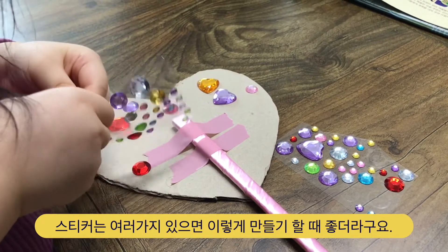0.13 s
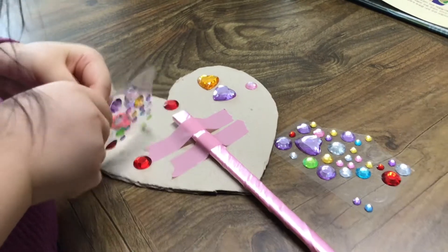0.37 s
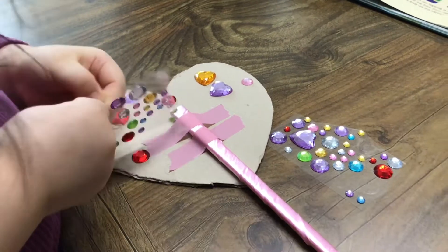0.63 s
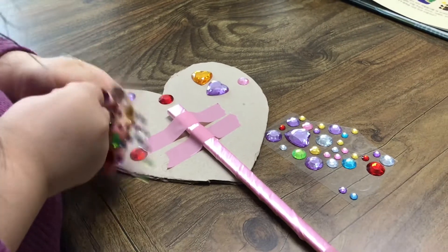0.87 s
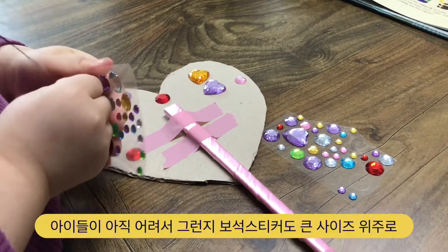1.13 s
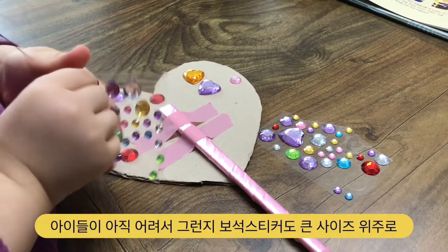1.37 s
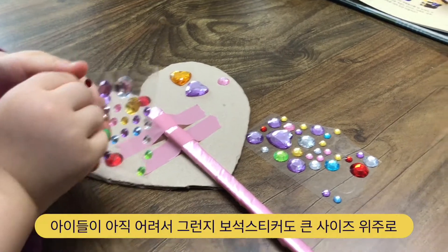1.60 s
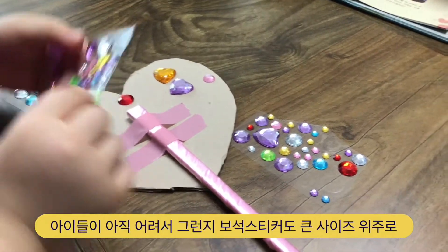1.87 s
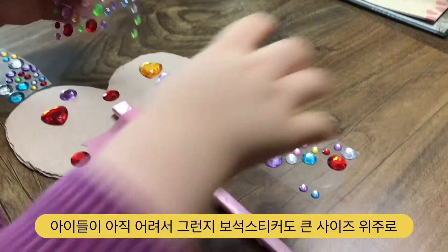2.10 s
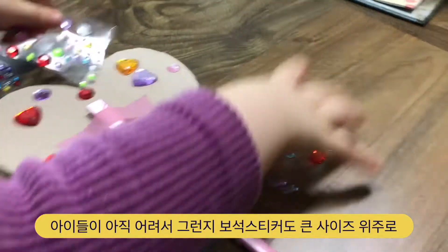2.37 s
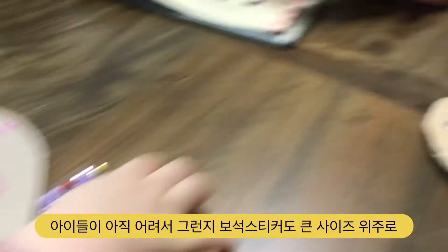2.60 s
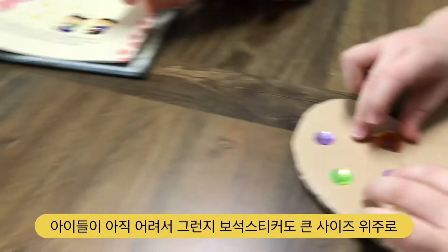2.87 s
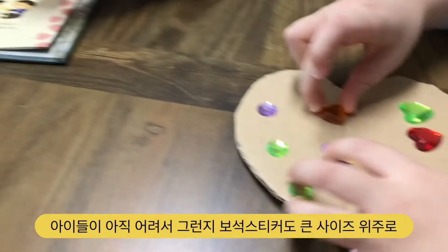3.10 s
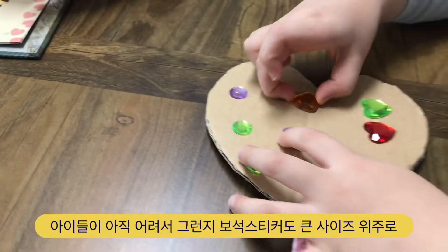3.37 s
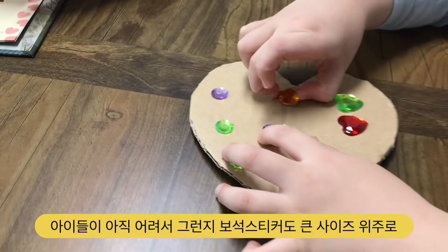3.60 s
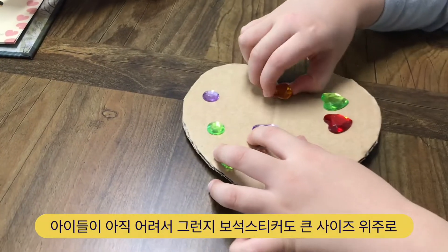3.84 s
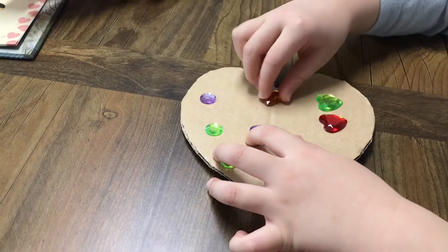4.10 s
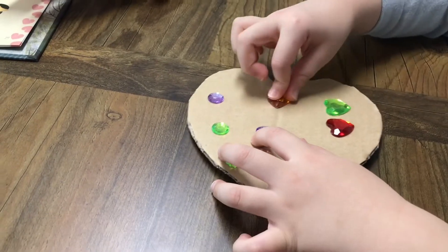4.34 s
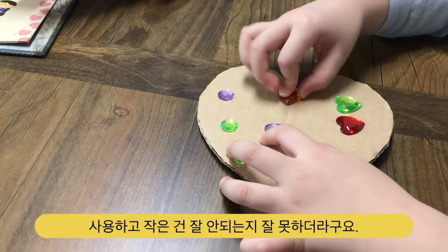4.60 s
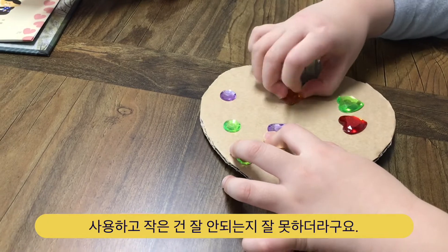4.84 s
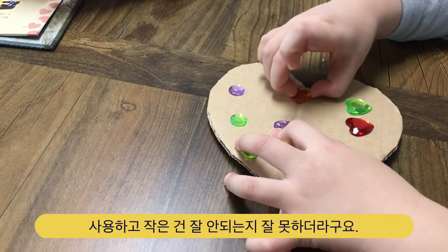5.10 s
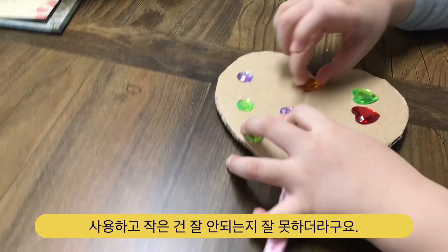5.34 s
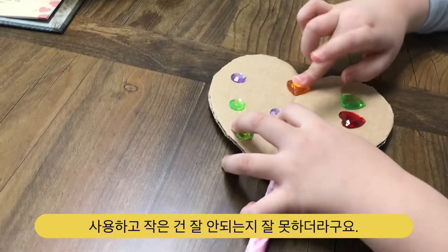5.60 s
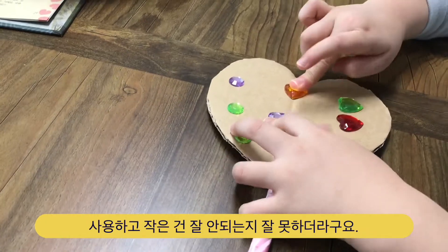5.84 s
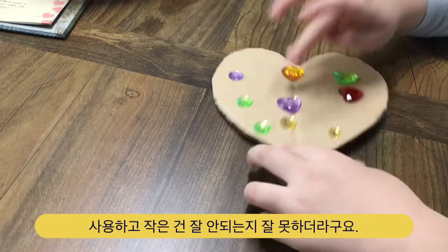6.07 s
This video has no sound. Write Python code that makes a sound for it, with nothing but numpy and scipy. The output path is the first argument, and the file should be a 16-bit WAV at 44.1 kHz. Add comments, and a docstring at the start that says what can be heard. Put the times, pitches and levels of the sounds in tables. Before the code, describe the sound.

A close phone microphone picks up small plastic gem stickers being handled on a wooden table in a quiet room, with faint low rumble and hum throughout. From 0 to 0.9 s, bright, short ringing snaps come thick and fast, with gritty click bursts, cardboard rubbing and a flexing, popping sheet, busiest around 0.45 s. Crinkles continue more sparsely; at 1.4 to 1.6 s hands knock the table in a quick woody clatter, capped by a sharp snap at 1.63 s. A hard double-toned snap lands at 2.4 s, another crisp one at 2.5 s. From 2.6 to 4.3 s it is softer: papery rubs, fine rustles, light taps, an isolated snap near 4.04 s. After 4.4 s, click bursts gather; crinkling swells to the loudest snap at 5.11 s, with gritty rips until 5.4 s. It calms, then a snap and table knock close at 6.2 s.

```python
"""Small plastic gems are peeled off a thin backing sheet and pressed onto cardboard on a wooden table.
A quiet room hums throughout while fingers rub the card and the sheet crinkles and pops.
Ringing glue snaps crowd the first second, with short bursts of tiny clicks; then they thin out and hands
knock the table. Sharp snaps stand out near 1.6 and 2.4 s; click bursts gather after 4.4 s, the strongest snap
comes near 5.1 s, and a last snap and knock close the scene. A phone close by hears it all."""
import sys
import numpy as np
from scipy import signal
from scipy.fft import rfft, irfft, next_fast_len
from scipy.io import wavfile
from scipy.ndimage import uniform_filter1d

SR = 44100
rng = np.random.default_rng(int(sys.argv[2]) if len(sys.argv) > 2 else 0)


def field_ratio(decibels):
    """Amplitude ratio for a level in dB (20 dB per decade); scalars and array-likes work."""
    return 10 ** (np.asarray(decibels, dtype=float) / 20)


def generate_wav(sig):
    """Save sig (samples, or channels by samples) to the path in sys.argv[1] as 16-bit PCM at SR."""
    pcm = np.round(np.clip(np.atleast_2d(sig).T, -1, 1) * 32767).astype(np.int16)
    wavfile.write(sys.argv[1], SR, pcm)


N = 273861

# resonances of the cardboard: pitch_hz, width_hz (first of two passes), level_db (relative)
CARD_MODES = [(1800, 170, -3), (2477, 460, 1), (3070, 600, -1), (3800, 750, 1), (5540, 2150, -12.5)]


def level(x, db):
    """Scale to an rms level."""
    return x * field_ratio(db) / np.sqrt(np.mean(x ** 2))


def peak(x, db):
    """Scale to a peak level."""
    return x * field_ratio(db) / np.max(np.abs(x))


def ring(x, hz, width_hz):
    """One resonance, a peak filter whose centre and width stay below 0.45 of the sample rate."""
    centre = min(hz, .45 * SR)
    width = min(width_hz, .45 * SR)
    b, a = signal.iirpeak(centre, centre / width, fs=SR)
    return signal.lfilter(b, a, x)


def treble(x, hz):
    """What lies above hz."""
    return signal.sosfilt(signal.butter(2, hz, "high", fs=SR, output="sos"), x)


def colour(x, spectrum):
    """Filter a sound by a curve of (Hz, dB) points, joined over log frequency."""
    hz, db = np.transpose(spectrum)
    size = next_fast_len(N)
    f = np.arange(size // 2 + 1) * SR / size + 1
    gain = field_ratio(np.interp(np.log(f), np.log(hz), db, left=-60, right=-60))
    return irfft(rfft(x, size) * gain, size)[:N]


def walk(rate):
    """Random levels that glide to a new value every 1 / rate s; spread near 1."""
    k = int(SR / rate)
    held = np.repeat(rng.standard_normal(N // k + 1), k)
    return 1.5 * uniform_filter1d(held, k)[:N]


def grit(shape, scatter_db, grain_s):
    """Noise in grains whose sizes scatter, a few of them large."""
    k = max(int(grain_s * SR), 1)
    grains = shape[-1] // k + 1
    sizes = field_ratio(scatter_db * rng.exponential(size=shape[:-1] + (grains,)))
    return rng.standard_normal(shape) * np.repeat(sizes, k, axis=-1)[..., :shape[-1]]


def add(out, s, x):
    """Mix x into out from time s."""
    i = int(s * SR)
    out[i:i + len(x)] += x[:len(out) - i]


def room():
    """Air and appliance rumble that wavers a little, with a wavering hum."""
    # room noise: pitch_hz, density_db (relative, per Hz)
    room_spectrum = [(28, -45), (40, -2), (64, 0), (109, -0.5), (250, -8), (355, -8.5), (461, -16.5),
                     (780, -19.5), (2100, -28), (3900, -27.5), (8500, -29), (16500, -32)]
    room_db, hum_hz, hum_db = -61, 118.5, -72  # rms before the wavering
    air = level(colour(rng.standard_normal(N), room_spectrum), room_db) * field_ratio(walk(4.886))
    hum = np.sqrt(2) * field_ratio(hum_db + walk(2.0)) * np.sin(2 * np.pi * hum_hz * np.arange(N) / SR)
    return air + hum


def card(x, sway_db):
    """The cardboard's resonances, neighbours in opposite phase; sway_db lets each swell on its own."""
    out = 0
    for k, ((hz, width, db), sway) in enumerate(zip(CARD_MODES, sway_db)):
        mode = ring(ring(x, hz, width), hz, 2 * width)
        out = out + (-1) ** k * field_ratio(db + sway) * mode
    return out


def swells(s, db, swell, fade):
    """Gain of overlapping gestures; each is 20 dB down swell s before and fade s after its loudest moment."""
    resting_db = -83  # floor under all the gestures
    t = np.arange(0, N, 64) / SR
    power = field_ratio(2 * resting_db)
    for k in range(len(s)):
        distance = np.maximum((s[k] - t) / swell[k], (t - s[k]) / fade[k])
        power = power + field_ratio(2 * db[k] - 40 * distance)
    return np.interp(np.arange(N) / SR, t, np.sqrt(power))


def ticks(gain):
    """Single small creases snap at random moments, as loud as the sheet is busy."""
    ticks_per_s = 130
    out, t = np.zeros(N), np.arange(512) / SR
    count = int(ticks_per_s * N / SR)
    draws = zip(rng.random((count, 3)), rng.standard_normal((count, len(t))))
    for (when, pitch, size), noise in draws:
        hz = 1500 * 8.0 ** pitch
        burst = noise * field_ratio(-60 * t / .009)
        tick = peak(ring(burst, hz, .5 * hz), 3 + 8 * size)  # peaks 3 to 11 dB over the gain
        add(out, when * N / SR, tick * gain[int(when * N)])
    return out


def pops(low_hz, high_hz, tilt_db, scatter_db, count=14):
    """Creases in the sheet flip over, each ringing a few cycles at its own pitch."""
    out = 0
    for hz in np.geomspace(low_hz, high_hz, count):
        crease = ring(ring(grit((N,), scatter_db, 0.0022), hz, hz / 7), hz, hz / 3)
        out = out + field_ratio(tilt_db * np.log2(hz / low_hz)) * crease  # tilt in dB per octave
    return level(out, 0)


def hands():
    """Skin slips over the card's fibres, the sheet crinkles in fine grains and pops where it flexes."""
    # hand moves, rustles that swell and fade (levels before the random flicker):
    # loudest_s, card_rub_db, sheet_crinkle_db, swell_s, fade_s
    moves = [(0.0, -58.5, -64, .05, 0.12), (0.118, -54.5, -54, 0.027, 0.075),
             (0.233, -53, -55, 0.055, 0.087), (0.303, -61, -52, 0.096, .05),
             (0.351, -67, -59.5, 0.059, 0.2), (0.479, -50, -51, 0.075, 0.053), (0.56, -83, -60, 0.11, 0.12),
             (0.698, -57, -53.5, 0.081, 0.087), (0.804, -77, -61, 0.68, 0.52),
             (1.023, -68, -55, 0.062, 0.07), (1.124, -59, -50, 0.038, 0.031),
             (1.269, -66, -47.5, 0.09, 0.059), (1.399, -75, -67, 0.067, 0.18),
             (1.644, -61, -54.5, 0.15, 0.31), (1.772, -61, -53.5, 0.033, 0.047),
             (1.922, -72, -51, 0.23, 0.12), (2.176, -63, -62.5, 0.035, 0.14),
             (2.33, -59.5, -55, 0.049, 0.2), (2.42, -56.5, -59.5, 0.13, 0.091),
             (2.51, -50, -49, 0.073, 0.067), (2.654, -55.5, -57, 0.094, 0.097),
             (2.756, -57, -65.5, 0.19, 0.55), (2.852, -55, -49.5, 0.087, 0.12),
             (3.026, -54.5, -57, 0.16, 0.2), (3.24, -58, -52.5, 0.18, 0.088),
             (3.265, -48.5, -71, 0.033, 0.14), (3.52, -63.5, -60, 0.17, 0.045),
             (3.655, -57, -65, 0.065, 0.24), (3.801, -63, -57, 0.1, 0.082), (3.945, -59, -90, 0.25, 0.26),
             (4.06, -59, -59, 0.087, 0.093), (4.188, -64.5, -69.5, 0.49, 0.078),
             (4.272, -62.5, -68.5, 0.044, 0.21), (4.438, -56.5, -53, 0.076, 0.076),
             (4.5, -60, -62, 0.14, 0.033), (4.685, -60, -80, 0.41, 0.17), (4.957, -57.5, -51, 0.16, 0.33),
             (5.07, -76, -47, 0.23, 0.28), (5.16, -52, -46.5, 0.18, 0.091), (5.235, -55, -55, 0.08, 0.22),
             (5.335, -47, -55, 0.045, 0.11), (5.38, -50.5, -56.5, 0.27, 0.061),
             (5.625, -90.5, -63.5, 0.059, 0.089), (5.745, -58.5, -69.5, 0.11, 0.87),
             (5.936, -55, -49, 0.082, 0.11)]
    # the sheet bends and its creases pop: loudest_s, level_db, swell_s, fade_s
    bends = [(0.233, -55, 0.08, 0.3), (0.459, -47, 0.033, 0.11), (0.698, -54, 0.071, 0.092),
             (1.399, -66, 0.43, 0.21), (1.644, -59, 0.29, 0.26), (1.772, -65.5, 0.073, 0.48),
             (2.42, -60, 0.22, 0.12), (2.51, -56.5, 0.14, 0.17), (2.67, -61.5, 0.088, 0.13),
             (2.9, -72, 0.47, 0.95), (3.24, -66.5, 0.075, 0.38), (3.827, -67, 0.19, 0.4),
             (5.124, -57, 0.06, 0.34), (5.27, -55.5, 0.34, 0.088), (5.895, -65.5, 0.38, 0.11)]
    # crinkle of the sheet: pitch_hz, density_db (relative, per Hz)
    sheet_spectrum = [(1200, -41), (2500, -13), (4500, -6), (6000, -4.5), (9000, -2), (16500, -6.5)]

    s, card_db, sheet_db, swell, fade = np.transpose(moves)
    crinkle_gain = swells(s, sheet_db, swell, fade)
    fibres = grit((N,), 2.1, .0012)
    sway_db = 2.2 * np.array([walk(25) for _ in CARD_MODES])
    rub = level(card(fibres, sway_db), 0)
    rub = rub * swells(s, card_db, swell, fade) * field_ratio(1.2 * walk(40))

    sheet = level(colour(grit((N,), 1.4, 0.00051), sheet_spectrum), 0)
    bright = treble(sheet, 8700)  # the finest creases flicker on their own
    sheet = (sheet - bright) * field_ratio(2 * walk(30)) + bright * field_ratio(2 * walk(18))
    crinkle = sheet * crinkle_gain * field_ratio(walk(45))

    flex = pops(520, 2600, tilt_db=-1.5, scatter_db=2.4) * swells(*np.transpose(bends))
    return rub + crinkle + ticks(crinkle_gain) + flex


def table_top(force):
    """The table's modes under a force; the slowest motion radiates poorly."""
    # modes of the wooden top: pitch_hz, level_db (relative), t60_s
    table_modes = [(104, -2.5, 0.034), (213, -3.5, 0.038), (371.5, 3, 0.045), (580, 2, 0.035),
                   (692, 5.5, 0.09), (903, 7.5, 0.052), (1090, 11.5, 0.047), (1530, 17, 0.027)]
    t = np.arange(4096) / SR
    board = sum(field_ratio(db - 60 * t / t60) * np.sin(2 * np.pi * hz * t) for hz, db, t60 in table_modes)
    return treble(signal.fftconvolve(force, board), 132)


def knocks():
    """A half-sine push on the table; a softer, longer contact favours the low modes."""
    # hands knocking the table: start_s, peak_db, contact_s
    knock_table = [(0.255, -42.5, 0.0085), (1.3843, -27.5, 0.0032), (1.399, -44, 0.0018),
                   (1.478, -35.5, 0.0037), (1.535, -35, 0.0032), (1.575, -39, 0.0024),
                   (1.594, -38.5, 0.002), (1.6322, -27.5, 0.00078), (2.311, -43, 0.0039),
                   (2.685, -48.5, 0.0015), (2.835, -47.5, 0.0018), (2.959, -40, 0.0011),
                   (3.166, -55, 0.001), (3.608, -53.5, 0.001), (3.812, -46.5, 0.00084),
                   (3.848, -49.5, 0.00078), (3.908, -54, 0.0012), (4.406, -40.5, 0.0024),
                   (4.427, -45, 0.0032), (6.195, -37.5, 0.0011)]
    out, t = np.zeros(N), np.arange(1024) / SR
    for s, db, contact in knock_table:
        push = np.sin(np.pi * np.clip(t / contact, 0, 1))
        add(out, s, peak(table_top(push), db))
    return out


def click_bursts():
    """Short bursts of dense tiny clicks, grainy noise that starts sharply and soon dies out."""
    # glue rips, the clatter of taps near 1.4 to 1.5 s and the tail of the snap at 2.4 s:
    # start_s, level_db (rms of the body, its energy spread over length_s), ring_hz,
    # treble_db (relative to the body), length_s
    burst_table = [(0.267, -45.5, 2240, -6, 0.02), (0.447, -34.5, 2740, -15, 0.01),
                   (0.458, -40, 6030, 1, 0.0042), (0.464, -38.5, 6600, -1.5, 0.011),
                   (1.11, -51.5, 2300, 6.5, 0.0086), (1.38, -49, 3930, 7, 0.0083),
                   (1.475, -46.5, 4070, -2, 0.0068), (1.53, -48, 3420, -16, 0.0097),
                   (1.574, -46.5, 2170, -7.5, 0.029), (2.414, -55, 1700, -25, 0.063),
                   (4.386, -55.5, 6000, 8, 0.027), (4.616, -55, 2940, -19, 0.063),
                   (4.67, -47.5, 2780, -19, 0.018), (4.785, -51, 3020, -12, 0.047),
                   (5.194, -43.5, 2930, -4, 0.015), (5.209, -39.5, 2680, 6, 0.013),
                   (5.2407, -37, 2200, -26, 0.024)]
    out, t = np.zeros(N), np.arange(4096) / SR
    clicks = grit((len(burst_table), 2, len(t)), 2.8, .001)
    for (s, db, hz, treble_db, length), noise in zip(burst_table, clicks):
        shape = np.minimum(t / .001, 1) * np.exp(-(t / length) ** 4)
        gain = np.sqrt(SR * length / len(t))  # from rms over the whole buffer to rms over the burst
        body = level(ring(ring(noise[0] * shape, hz, hz / 1.52), hz, 9.9 * hz), db)
        hiss = level(treble(noise[1] * shape, 5400), db + treble_db)
        add(out, s, gain * (body + hiss))
    return out


def sheet_ring(force, scatter):
    """The sheet's modes under a force; every grip shifts and weights them a little differently."""
    # modes of the sheet before the scatter: pitch_hz, level_db (relative), t60_s
    sheet_modes = [(1280, -0.5, 0.019), (1650, 0, 0.028), (2440, -8, 0.026), (2880, -7, 0.018),
                   (3666, 5.5, 0.016), (4520, 7, 0.0045), (6100, -2.5, 0.018), (6970, 7.5, 0.011)]
    t = np.arange(1024) / SR
    modes = 0
    for (hz, db, t60), (a, b) in zip(sheet_modes, scatter):
        decay = field_ratio(db + 2.5 * a - 60 * t / t60)
        modes = modes + decay * np.sin(2 * np.pi * hz * (1 + .02 * b) * t)
    return signal.fftconvolve(force, modes)[:len(force)]


def snaps():
    """A sudden release rings the gem and the sheet, thuds low, cracks in the treble and leaves a faint tail."""
    # glue and plastic snaps: start_s, level_db (reference for the peak of each part below), ring_hz,
    # crack_db and thud_db (relative to level_db, before the trims below)
    snap_table = [(0.0145, -18, 3400, -50, -21.5), (0.0813, -22, 4300, -19, -32),
                  (0.0988, -30, 4500, -11.5, -21), (0.122, -20.5, 2230, -33, -35),
                  (0.1933, -39, 1800, -8, -17), (0.2005, -18.5, 2040, -25, -30),
                  (0.225, -27, 1800, -7, -21.5), (0.306, -37, 3500, -3, -10),
                  (0.3129, -24.5, 5970, -19, -24), (0.346, -40.5, 2200, -6.5, -15),
                  (0.38, -40, 2460, -27, -14), (0.43, -39, 2300, 5, -35), (0.4473, -23, 2350, -6.5, -17.5),
                  (0.521, -32, 1570, -15, -33), (0.5397, -40.5, 850, -15, -19),
                  (0.6463, -33.5, 1780, -12, -26), (0.662, -28, 3800, -14.5, -28),
                  (0.677, -31.5, 2400, -30, -12.5), (0.694, -46, 960, -27, -1),
                  (0.7972, -34.5, 5660, -7, -21), (0.862, -37, 9100, -2.5, -38),
                  (1.1108, -35, 7550, -17, -36), (1.218, -31.5, 8300, -12, -34),
                  (1.3841, -30.5, 1650, -16, -23), (1.402, -38, 2200, -6, -10.5),
                  (1.4762, -30.5, 1650, -14, -37), (1.531, -32.5, 1650, -20, -27),
                  (1.54, -39, 1310, -20, -12), (1.6282, -13, 6500, -14, -23.5),
                  (1.912, -32, 3300, -4.5, -39), (1.926, -34.5, 5000, -8, -32),
                  (2.207, -33.5, 6270, -13.5, -20), (2.3118, -41.5, 1560, -7.5, -15),
                  (2.4096, -14, 1730, -31, -42), (2.4096, -15, 4670, -31, -47), (2.42, -46, 2000, -15, -32),
                  (2.49, -36, 2270, -5, -36), (2.5014, -21.5, 5060, -3.5, -21.5),
                  (2.784, -34, 2900, -13, -33), (2.9608, -32, 5950, -4.5, -19),
                  (3.2303, -36, 2400, -22, -35), (3.423, -28.5, 2400, -47, -41),
                  (3.658, -38, 2500, -28, -35), (4.041, -25, 4200, -10.5, -53),
                  (4.5608, -27.5, 2900, -12.5, -24.5), (5.0508, -29.5, 2820, -35, -12),
                  (5.1136, -8, 2530, -23, -58), (5.696, -31.5, 4840, -21, -42),
                  (6.1778, -32, 2330, -14, -34), (6.1936, -23, 2160, -9.5, -21)]
    snap_t60_s, tail_t60_s = .012, .045
    out, t = np.zeros(N), np.arange(4096) / SR
    rise = np.minimum(t / 0.001015, 1) ** 2
    fall = field_ratio(-60 * t / snap_t60_s)
    noises = rng.standard_normal((len(snap_table), 4, len(t)))
    for (s, db, hz, crack_db, thud_db), noise in zip(snap_table, noises):
        # the release itself is one sharp step; smaller slips surround and trail it
        force = .12 * noise[0] * rise * fall
        force[int(.0012 * SR)] += 1
        gem = peak(ring(ring(force, hz, hz / 5.0), hz, 1.15 * hz), db - 7.5)
        sheet = sheet_ring(force, noise[3].reshape(-1, 2))
        sheet = peak(ring(ring(sheet, hz, hz / 1.33), hz, 1.2 * hz), db - 10)
        thud = peak(ring(ring(force, 960, 1830), 1150, 2300), db + thud_db + 12)
        crack = peak(treble(noise[1] * rise * fall, 3370), db + crack_db + 9.5)
        tail = peak(ring(noise[2], hz, 2 * hz) * rise * field_ratio(-60 * t / tail_t60_s), db - 23)
        add(out, s, gem + sheet + thud + crack + tail)
    return out


def scene():
    """Everything at one microphone."""
    return (room() + hands() + knocks() + click_bursts() + snaps())[None]


def band_limit(x):
    """A steep low-pass at the top of the band."""
    return signal.sosfilt(signal.butter(12, 16830, fs=SR, output="sos"), x)


def record(dry):
    """The phone's port colours the treble, its low end falls away and a steep filter cuts the very top."""
    # response of the microphone: pitch_hz, gain_db
    mic_response = [(10, -44), (28, -31), (40, 2.5), (4500, -0.5), (6200, 1.5), (7800, -2.5), (9200, -1.5),
                    (10500, -4.5), (12500, 0.5), (22000, -4)]
    top_hz = 15800
    coloured = colour(dry[0], mic_response)
    low_pass = signal.ellip(6, .2, 26, top_hz, fs=SR, output="sos")  # 0.2 dB ripple, 26 dB stop
    mix = signal.sosfilt(low_pass, coloured)[None]
    return band_limit(mix)


dry = scene()
out = record(dry)
generate_wav(out)
```